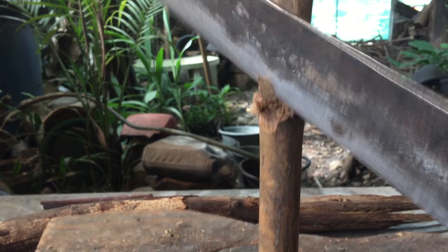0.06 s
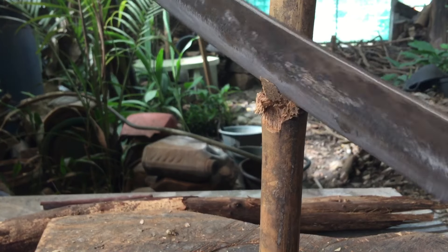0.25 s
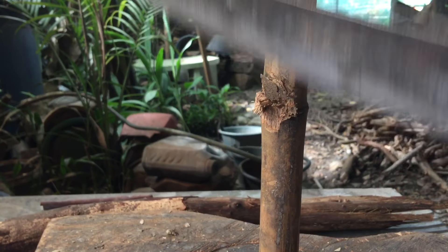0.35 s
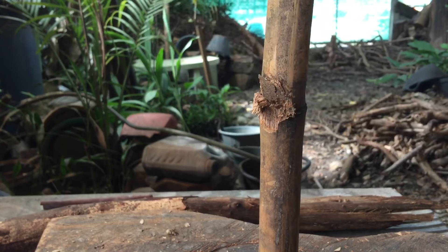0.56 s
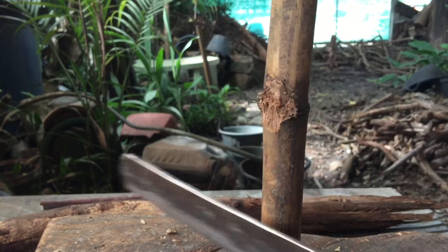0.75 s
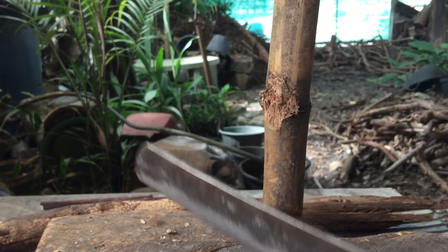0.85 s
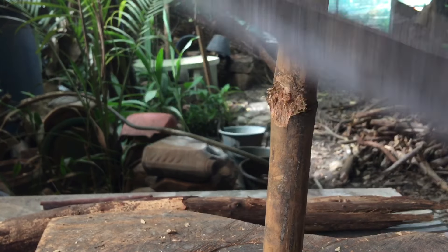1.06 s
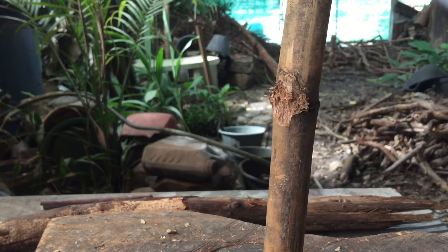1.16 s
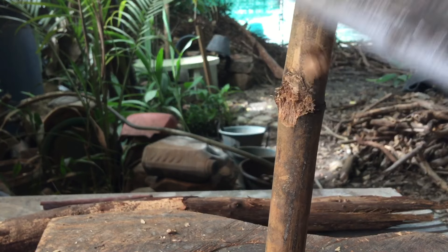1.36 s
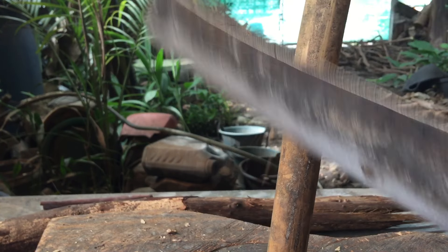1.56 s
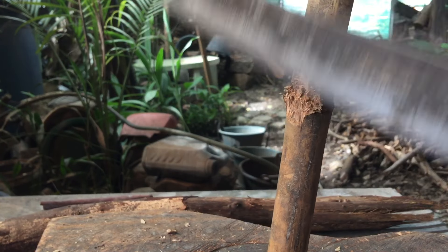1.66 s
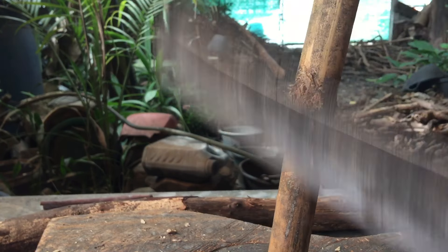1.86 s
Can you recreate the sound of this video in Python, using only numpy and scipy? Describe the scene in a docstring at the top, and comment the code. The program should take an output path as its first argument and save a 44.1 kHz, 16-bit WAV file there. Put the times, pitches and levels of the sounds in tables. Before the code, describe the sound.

Two loud, hollow chops of a heavy knife into bamboo clip the microphone, with a brief steel ring and short outdoor echo. After a few faint falling splinters, the blade scrapes more softly along the pole, catching and clicking.

```python
"""A sharp crack and a hollow boom, twice: a heavy knife chops a standing bamboo pole in a yard.
Each chop cracks fibres, rings the pole and the blade, and clips the microphone; chips tick down after.
The blade then rasps along the pole, knocking and catching in tiny slips that hiss and ring the steel.
A short yard echo and faint outdoor air lie underneath."""
import sys
import numpy as np
from scipy import signal
from scipy.fft import rfft, irfft
from scipy.io import wavfile
from scipy.ndimage import uniform_filter1d

SR = 44100
rng = np.random.default_rng(int(sys.argv[2]) if len(sys.argv) > 2 else 0)


def materialize(psi):
    """Save the field psi as 16-bit PCM at rate SR to the path in sys.argv[1].

    A 1-D psi becomes a single channel; in a 2-D psi each row is a channel.
    """
    bounded = np.clip(np.atleast_2d(psi).T, -1, 1)
    quanta = np.round(bounded * 32767).astype(np.int16)
    wavfile.write(sys.argv[1], SR, quanta)


N = 83790

# Spectra of air, rasp hiss, thud and fibre crack. Each row: frequency in Hz, relative density in dB.
AIR_SPECTRUM = [(25, -13.5), (55, -4.5), (98, 6), (160, -15.5), (380, -13), (600, -9), (1300, -16),
                (1850, -12), (3200, -28), (7000, -37.5), (16000, -46.5)]
HISS_SPECTRUM = [(300, -21), (600, 9), (1200, -3), (2000, 0.5), (3200, 9), (5000, -9.5), (9000, 2.5),
                 (13500, -6.5), (16000, -11)]
THUD_SPECTRUM = [(25, -10), (55, -12), (130, -2.5), (330, -7), (620, 4.5), (1100, -0.5), (1500, -8.5),
                 (3000, -19), (8000, -42)]
CRACK_SPECTRUM = [(100, -4.5), (600, -1), (2000, -0.5), (4500, 5.5), (8000, -1), (11000, 1), (16000, -15)]
# Echo tail. Each row: band centre in Hz, gain in dB, T60 in seconds.
YARD_BANDS = [(60, -12.5, 0.31), (170, -9.5, 0.35), (330, -14.5, 0.34), (620, -14.5, 0.4),
              (1200, -10.5, 0.29), (2472, -14.5, 0.3), (5340, -25, 0.29), (8860, -27.5, 0.31),
              (15000, -33.5, 0.13)]
# Falling chips. Each row: start in seconds, level in dB, centre in Hz, half-width in octaves.
CHIPS = [(0.373, -45, 1206, 0.96), (0.822, -32, 5950, 0.86), (0.8766, -20, 4510, 0.31),
         (0.88, -29.5, 2160, 0.32), (1.129, -42.5, 5440, 0.98), (1.133, -42, 3223, 0.053)]
# Blade modes. Each entry: frequency in Hz, T60 in seconds, relative level in dB when rubbed.
BLADE_HZ = [1795, 3700, 4590, 5178, 5400, 6400, 6762, 7700, 9240, 9810, 10700, 12310, 13150, 14010]
BLADE_T60_S = [0.26, 0.043, 0.059, 0.047, 0.23, 0.042, 0.055, 0.065, 0.05, 0.037, 0.05, 0.049, 0.035, 0.06]
BLADE_RUB_DB = [-6.5, -9, -0.5, -7.5, -14.5, -6.5, -15, -5, -3.5, -13.5, -6, -7.5, -13.5, -4]
# Struck blade. Each row: one chop's level in dB for every mode.
BLADE_CHOP_DB = [
    [-36.5, -31, -32, -29.5, -39, -30.5, -12, -19, -11, -30.5, -33, -33.5, -32, -41],
    [-38, -40.5, -27, -9, -36, -21, -19.5, -41, -11.5, -20, -21, -27.5, -13, -38],
]
# Rasp envelope. Each row: time in seconds, strength in dB.
RASP_ENVELOPE = [(1.353, -64), (1.371, -29), (1.39, -62), (1.403, -71), (1.412, -45), (1.45, -61),
                 (1.462, -33), (1.522, -37.5), (1.532, -42), (1.564, -26), (1.601, -26.5), (1.621, -36),
                 (1.645, -41), (1.69, -51), (1.711, -35), (1.728, -41), (1.785, -39.5), (1.815, -30.5),
                 (1.854, -46), (1.9, -24.5)]
# Knock noise bands, low to high. Each row: centre in Hz, width in Hz.
KNOCK_BANDS = [(185, 110), (580, 300), (1250, 390), (1920, 770), (4800, 11000), (10500, 8700)]
# Blade knocks. Each row: start in seconds, contact in seconds, six band levels in dB, ring drive in dB.
KNOCKS = [(0.1127, 0.011, -51.5, -41.5, -48.5, -57.5, -45.5, -53, -64),
          (0.712, 0.002, -57, -41, -44, -63, -47.5, -70, -48),
          (1.365, 0.022, -62, -53.5, -56, -52.5, -46, -62, -42.5),
          (1.406, 0.005, -76, -57, -76, -63, -52, -53, -43),
          (1.4579, 0.00092, -60, -36.5, -33, -23, -45, -67, -33.5),
          (1.604, 0.0047, -22.5, -20, -34, -30.5, -20.5, -12.5, -29),
          (1.6619, 0.0042, -56, -27, -29.5, -27, -31.5, -57, -34.5),
          (1.71, 0.002, -67, -54, -67, -49, -49, -35.5, -69),
          (1.756, 0.011, -57.5, -53, -47, -40, -42.5, -64, -69),
          (1.7972, 0.00055, -60, -47.5, -37, -36.5, -37.5, -43, -53)]
# Pole modes. Each entry: frequency in Hz, level in dB before the boom gain, T60 in seconds.
POLE_HZ = [194, 378, 530, 649, 720, 815, 921, 989, 1143, 1375, 1571, 1765, 1950]
POLE_DB = [-26.5, -21, -3.5, -4, -4, -13.5, -7.5, -5, -15.5, -22.5, -17.5, -11, -21.5]
POLE_T60_S = [0.19, 0.088, 0.056, 0.053, 0.07, 0.088, 0.072, 0.071, 0.062, 0.16, 0.015, 0.042, 0.084]
# Chops. Each row: start in seconds, crack hold in seconds, crack level in dB, boom delay in seconds,
# boom gain in dB.
CHOPS = [(0.1359, 0.0031, -1.5, 0.0032, 0.5), (0.7323, 0.0057, -7.5, 0.005, -0.5)]

TICK_FALL_S, KNOCK_FALL_S = 0.0014, 0.0059
BIN_HZ = np.maximum(np.arange(N // 2 + 1) * SR / N, 1)


def undb(db):
    """Decibels to gain."""
    return 10 ** (np.asarray(db) / 20)


def unit(x):
    """Scale to rms 1."""
    return x / np.sqrt(np.mean(x ** 2) + 1e-18)


def noise():
    """White noise."""
    return rng.standard_normal(N)


def wander(samples):
    """Smooth random drift, rms 1."""
    return unit(uniform_filter1d(uniform_filter1d(noise(), samples), samples))


def shaped(x, gains):
    """Apply one gain per spectral bin."""
    return irfft(rfft(x) * gains, N)


def colour(x, spectrum):
    """Shape by (Hz, dB) points; rms 1."""
    hz, db = np.array(spectrum, float).T
    return unit(shaped(x, undb(np.interp(np.log(BIN_HZ), np.log(hz), db))))


def band_noise(centre_hz, width_hz):
    """Noise through a broad resonance."""
    detune = (BIN_HZ ** 2 - centre_hz ** 2) / (BIN_HZ * width_hz)
    return shaped(noise(), 1 / np.hypot(1, detune ** 2))


def since(start_s):
    """Seconds since the start, zero before it."""
    return np.maximum(np.arange(N) / SR - start_s, 0)


def burst(start_s, hold_s, fall_s):
    """Envelope: sudden onset, hold, exponential fall."""
    return (since(start_s) > 0) * np.exp(-since(start_s + hold_s) / fall_s)


def ring(start_s, hz, t60_s):
    """One decaying mode."""
    age_s = since(start_s)
    return np.sin(2 * np.pi * hz * age_s) * np.exp(-np.log(1000) * age_s / t60_s)


def air(level_db=-55, swell_db=3.45):
    """Faint outdoor air, swelling at random."""
    return undb(level_db + swell_db * wander(4000)) * colour(noise(), AIR_SPECTRUM)


def yard_echo(x, gap_s=0.0093, near_db=-18.5):
    """Quick reflections off ground and clutter, then a tail that loses its treble first."""
    tail, log_centres = noise(), np.log([row[0] for row in YARD_BANDS])
    response = undb(near_db) * unit(noise() * burst(gap_s, 0, fall_s=0.0044))
    for selector, (_, db, t60_s) in zip(np.eye(len(YARD_BANDS)), YARD_BANDS):
        band = shaped(tail, np.interp(np.log(BIN_HZ), log_centres, selector))
        response += undb(db) * band * unit(burst(gap_s, 0, t60_s / np.log(1000)))
    return signal.fftconvolve(x, response / np.sqrt(N))[:N]


def pressed_blade(x, stretch=1, half_width_hz=170, valley_db=-12):
    """Filter by the blade's modes, broadened and stretched by contact with the pole; rms 1."""
    peaks = sum(undb(db) / (1 + ((BIN_HZ - hz * stretch) / half_width_hz) ** 2)
                for hz, db in zip(BLADE_HZ, BLADE_RUB_DB))
    bass = 1 / (1 + (BIN_HZ / BLADE_HZ[0]) ** 2)
    return unit(shaped(x, peaks + undb(valley_db) * (1 + bass)))


def rubbed_blade(force, wander_db=2.5, drift_hz=25):
    """Rubbing drives the blade's modes; each swells, fades and bends as the contact slides."""
    out, shares = np.zeros(N), undb(BLADE_RUB_DB)
    for hz, t60_s, share in zip(BLADE_HZ, BLADE_T60_S, shares / np.linalg.norm(shares)):
        feedback = np.exp((2j * np.pi * hz - np.log(1000) / t60_s) / SR)
        push = force * share * undb(wander_db * wander(1500))
        mode = signal.lfilter([np.sqrt(2 * (1 - abs(feedback) ** 2))], [1, -feedback], push)
        bend = np.exp(2j * np.pi * np.cumsum(drift_hz * wander(2500)) / SR)
        out += (bend * mode).imag
    return out


def blade_ticks(from_s=0.15, until_s=0.24, rate_per_s=130, level_db=-48):
    """Fibres tick faintly against the blade as it is pulled out of each cut."""
    pulling = sum((since(start_s) > from_s) & (since(start_s) < until_s) for start_s, *_ in CHOPS)
    contacts = pulling * (rng.random(N) < rate_per_s / SR) * rng.random(N)
    tick = pressed_blade(noise()) * burst(0, 0, TICK_FALL_S)
    return undb(level_db) * signal.fftconvolve(contacts, tick)[:N]


def chips(skitter_hz=4930, skitter_db=-30):
    """Splinters land with dry ticks and slide on faintly through the litter."""
    out, litter = np.zeros(N), unit(band_noise(skitter_hz, skitter_hz / 2))
    for start_s, db, hz, octaves in CHIPS:
        band = unit(shaped(noise(), 1 / (1 + (np.log2(BIN_HZ / hz) / octaves) ** 4)))
        tick = band * burst(start_s, hold_s=0.00093, fall_s=TICK_FALL_S)
        skitter = undb(skitter_db) * litter * burst(start_s, 0, fall_s=0.058)
        out += undb(db) * (tick + skitter)
    return out


def rasp(slips_per_s=3300, spread_db=5, grip_detune=0.026, sizzle_db=1.5, hiss_db=-13.5, ring_db=-9):
    """The edge slips on the pole's skin, hissing and ringing; a harder push is higher and brighter."""
    times_s, db = np.array(RASP_ENVELOPE).T
    strength = undb(np.interp(np.arange(N) / SR, times_s, db)) * (since(times_s[0]) > 0)
    catches = rng.random(N) < slips_per_s / SR
    slips = unit(catches * undb(spread_db * noise()) * np.sign(noise()))
    skin = colour(slips, HISS_SPECTRUM)
    push = strength / strength.max()
    pressure = np.clip(push + 0.5 * wander(900), -1, 1)
    # Pressure crossfades three tunings of the blade.
    hiss = sum(np.maximum(1 - abs(pressure - step), 0) * pressed_blade(skin, 1 + step * grip_detune)
               for step in (-1, 0, 1))
    sizzle = undb(sizzle_db) * push * unit(np.diff(hiss, prepend=0))
    return undb(hiss_db) * strength * (hiss + sizzle) + undb(ring_db) * rubbed_blade(strength * slips)


def knocks(low_lag_s=0.0027):
    """Light contacts: a short crunch, its two lowest bands late, and a ring of the blade."""
    crunch, force = np.zeros(N), np.zeros(N)
    bands = [pressed_blade(band_noise(hz, width_hz)) for hz, width_hz in KNOCK_BANDS]
    for start_s, hold_s, *bands_db, ring_db in KNOCKS:
        for k, (band, db) in enumerate(zip(bands, bands_db)):
            crunch += undb(db) * band * burst(start_s + low_lag_s * (k < 2), hold_s, KNOCK_FALL_S)
        force += undb(ring_db) * burst(start_s, hold_s, KNOCK_FALL_S)
    return crunch + rubbed_blade(force * noise())


def chops(thud_db=-7, boom_rise_s=0.0014, flex_hz=606, flex_db=12):
    """Fibres crack, the wall flexes, the hollow pole booms; the blade rings by where it was struck."""
    out = np.zeros(N)
    for (start_s, hold_s, crack_db, delay_s, boom_db), blade_db in zip(CHOPS, BLADE_CHOP_DB):
        crack = burst(start_s, hold_s, fall_s=0.0026) * colour(noise(), CRACK_SPECTRUM)
        boom_s = start_s + delay_s
        pole = sum(undb(db) * ring(boom_s, hz, t60_s)
                   for hz, db, t60_s in zip(POLE_HZ, POLE_DB, POLE_T60_S))
        thud = undb(thud_db) * burst(boom_s, 0, fall_s=0.013) * colour(noise(), THUD_SPECTRUM)
        boom = (pole + thud) * (1 - np.exp(-since(boom_s) / boom_rise_s))
        flex = ring(boom_s, flex_hz, t60_s=0.014) * (1 - np.exp(-since(boom_s) * flex_hz))
        blade = sum(undb(db) * ring(boom_s, hz, t60_s)
                    for hz, db, t60_s in zip(BLADE_HZ, blade_db, BLADE_T60_S))
        out += undb(crack_db) * crack + undb(boom_db) * boom + undb(flex_db) * flex + blade
    return out


def scene(rub_send_db=-1.5):
    """Knife, pole and chips in the yard, mono; the blows feed the echo with rounded peaks."""
    blows = chops() + chips() + blade_ticks()
    rubbing = knocks() + rasp()
    echo = yard_echo(2 * np.tanh(blows / 2) + undb(rub_send_db) * rubbing)
    return (blows + rubbing + echo + air())[None]


def record(dry, cutoff_hz=16000):
    """The microphone clips on the chops; a steep low-pass follows."""
    lowpass = signal.ellip(10, 0.1, 70, cutoff_hz, fs=SR, output="sos")
    return signal.sosfilt(lowpass, np.clip(dry, -1, 1))


dry = scene()
out = record(dry)
materialize(out)
```